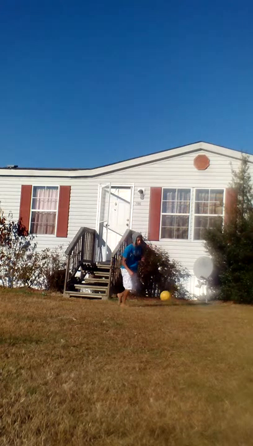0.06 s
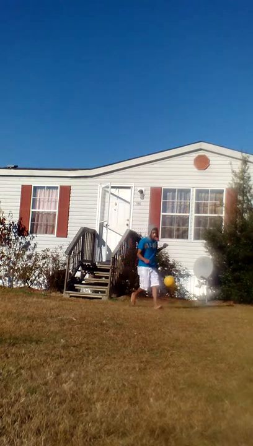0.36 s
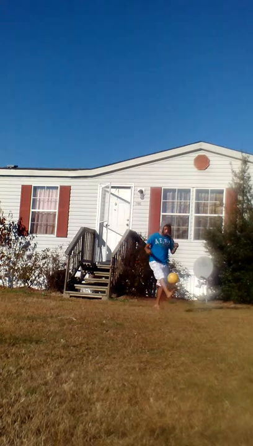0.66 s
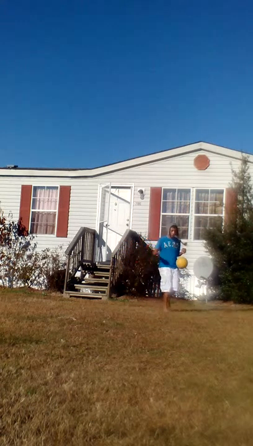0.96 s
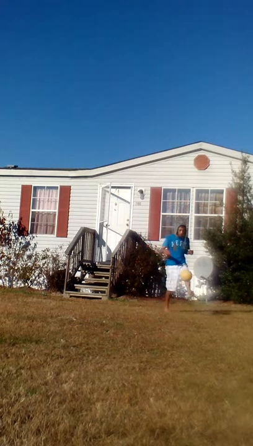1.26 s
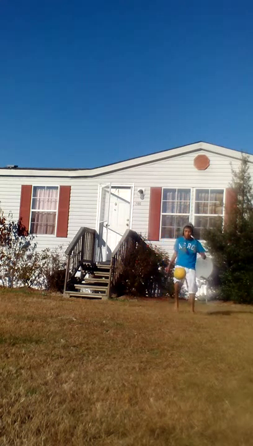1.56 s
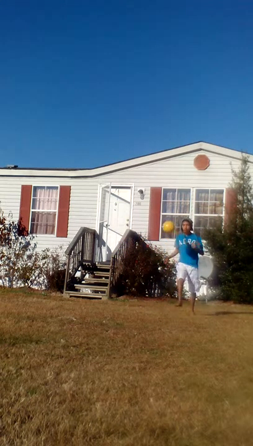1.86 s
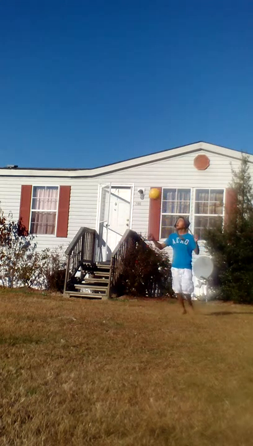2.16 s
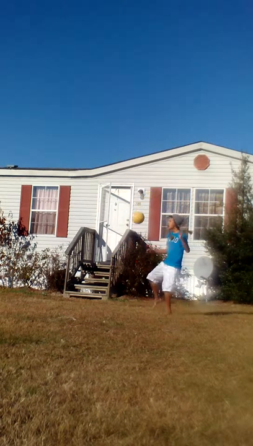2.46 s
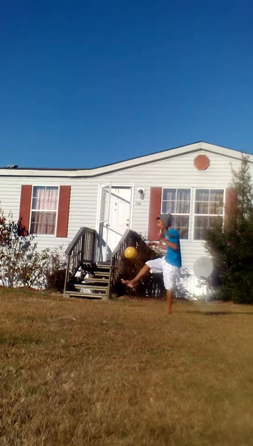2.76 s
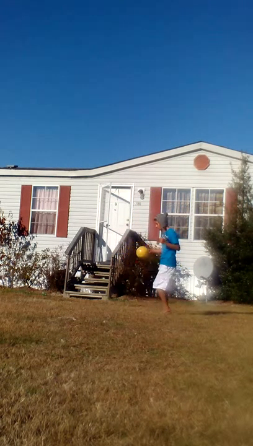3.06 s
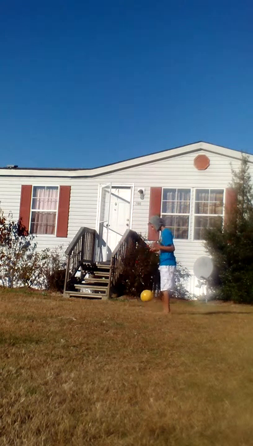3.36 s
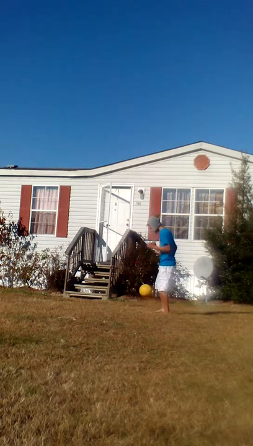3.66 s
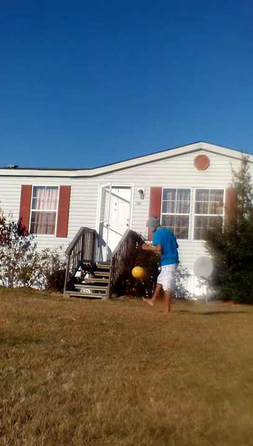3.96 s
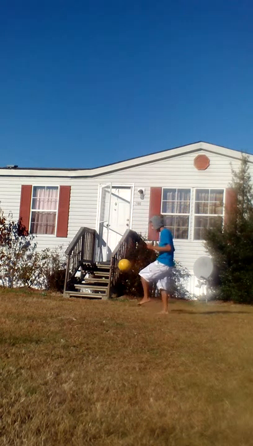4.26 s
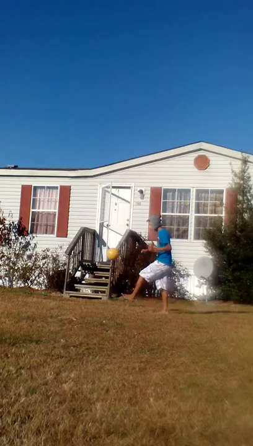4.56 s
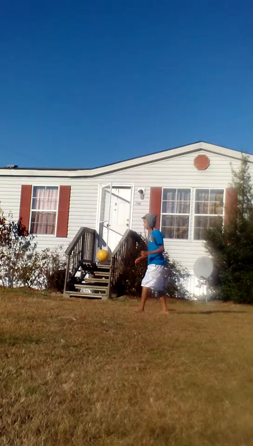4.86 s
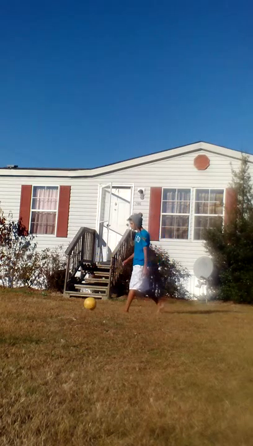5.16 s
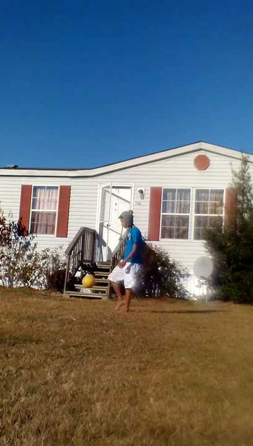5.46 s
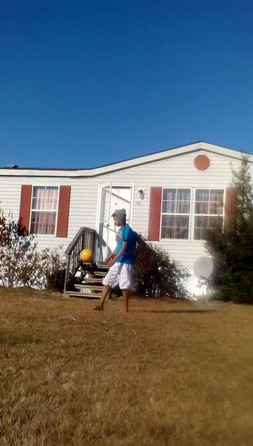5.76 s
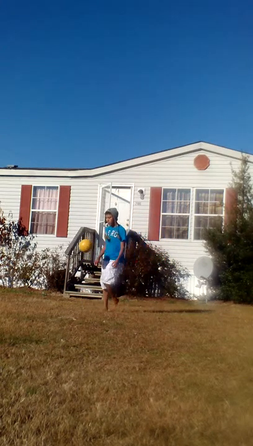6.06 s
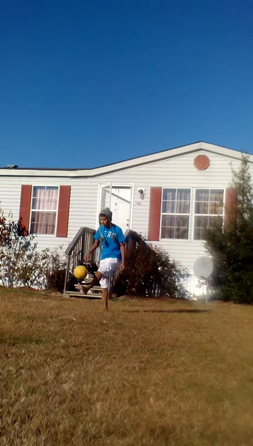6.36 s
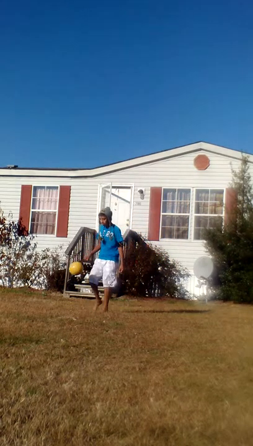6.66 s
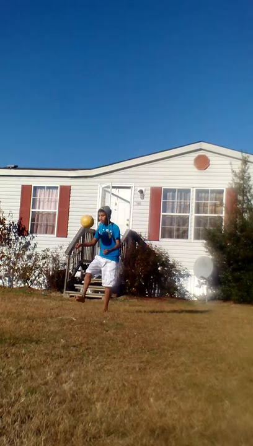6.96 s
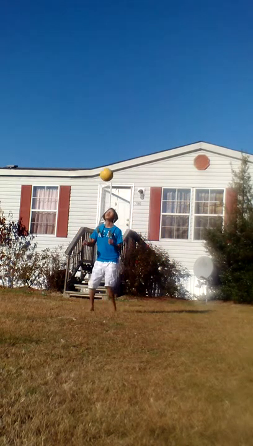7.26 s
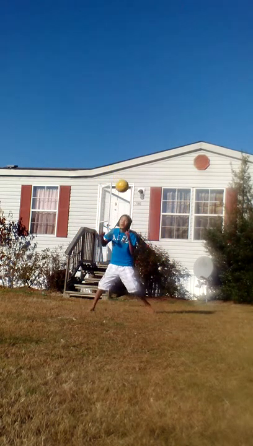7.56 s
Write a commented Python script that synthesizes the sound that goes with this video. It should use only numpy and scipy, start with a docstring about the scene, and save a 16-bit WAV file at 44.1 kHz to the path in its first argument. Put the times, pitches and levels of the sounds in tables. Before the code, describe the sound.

A ball is juggled barefoot on a lawn, a few metres from the microphone, over a quiet outdoor hush. Each touch is a hollow thump topped by a slap, with a very short echo from a house wall. The ball bounces dully on grass at 0.2 seconds, followed by a light touch at 0.7, a firmer kick at 1.3, the sharpest, loudest slap at 1.8 and another kick at 2.8. Meanwhile, light wind bumps the microphone until about 2.5 seconds, and a distant bird caws very faintly. A soft bounce at 3.5 leads to a faint tap at 3.9 and a crisp kick at 4.5. The ball lands again at 5.3, then come a lighter touch at 5.7 and clear kicks at 6.4 and 6.9. Feet faintly brush dry grass throughout, most noticeably near the end, and a small bird gives thin, distant whistles around 6 seconds.

```python
"""A football juggled barefoot on a lawn, some metres from a phone and in front of a house.
Each touch squashes the ball (thump), shakes its skin (pok), rings the air inside and slaps the cover.
Now and then it drops and bounces softly on the grass; the house front throws every hit back.
Feet brush dry blades, a light wind bumps the microphone, and far birds call over a quiet hush."""
import sys
import numpy as np
from scipy import signal
from scipy.fft import rfft, irfft
from scipy.io import wavfile

SR = 44100
rng = np.random.default_rng(int(sys.argv[2]) if len(sys.argv) > 2 else 0)


def generate_wav(signal):
    """Clip the signal to [-1, 1] and save it as 16-bit WAV at the path in sys.argv[1]."""
    frames = np.transpose(np.atleast_2d(signal))
    scaled = np.clip(frames, -1, 1) * 32767
    pcm = np.round(scaled).astype(np.int16)
    wavfile.write(sys.argv[1], SR, pcm)


N = 334719
TIME = np.arange(N) / SR  # scene clock, s
AGE = np.arange(8192) / SR  # one-shot clock, s


def undb(db):
    """Decibels to gain."""
    return 10 ** (np.asarray(db) / 20)


def level(x, db):
    """Set the rms level."""
    return x * undb(db) / np.sqrt(np.mean(x ** 2))


def hit_level(x, db):
    """Set a one-shot's level as if all its energy fell within 20 ms."""
    return x * undb(db) * np.sqrt(.02 * SR / np.sum(x ** 2))


def add(track, s, x):
    """Mix x into the track at time s."""
    i = max(int(s * SR), 0)
    track[i:i + len(x)] += x[:N - i]


def eq(x, curve, size=4096):
    """Minimum-phase EQ through (f/Hz, gain/dB) points, built from the cepstrum."""
    hz, db = np.transpose(curve)
    bins_hz = np.maximum(np.fft.rfftfreq(size, 1 / SR), 1)
    gain = undb(np.interp(np.log(bins_hz), np.log(hz), db))
    cepstrum = irfft(np.log(gain))
    cepstrum[1:size // 2] *= 2
    cepstrum[size // 2 + 1:] = 0
    impulse = irfft(np.exp(rfft(cepstrum)))
    return signal.fftconvolve(x, impulse)[:len(x)]


def band(x, low_hz, high_hz, order=2):
    """Band-pass."""
    return signal.sosfilt(signal.butter(order, [low_hz, high_hz], "band", fs=SR, output="sos"), x)


def swell(s, width_s):
    """A bell envelope centred on s, down to 1/e at width_s either side."""
    return np.exp(-np.minimum(((TIME - s) / width_s) ** 2, 50))


def burst(decay_s):
    """Noise with an instant attack and an exponential tail."""
    return rng.standard_normal(len(AGE)) * np.exp(-AGE / max(decay_s, .0001))


def decay(t60):
    """An envelope that falls 60 dB in t60 seconds."""
    return np.exp(-np.log(1000) * AGE / t60)


def scattered(count):
    """Random moments spread over the whole scene."""
    return (np.arange(count) + rng.random(count)) / count * N / SR


# tone of the outdoor bed: f/Hz, gain/dB
HUSH_EQ = [(25, -7.5), (43, -5), (60, -6.5), (105, -4.5), (150, -7.5), (250, -12.5), (450, -16),
           (700, -17.5), (1500, -23), (3000, -26.5), (5500, -28), (7000, -39), (9000, -60.5)]

def hush(rumble_db=-56.5, hiss_db=-74):
    """The bed: distant rumble under an even hiss."""
    rumble = level(eq(rng.standard_normal(N), HUSH_EQ), rumble_db)
    hiss = level(band(rng.standard_normal(N), 6200, 10000, order=3), hiss_db)
    return rumble + hiss


# a distant hoarse bird: t/s, half-width/s, f/Hz, level/dB
CAW_CUES = [(0.1, 0.26, 1480, -68), (0.728, 0.07, 1470, -66.5), (0.998, 0.042, 1480, -61),
            (1.458, 0.12, 1460, -65.5), (2.23, 0.069, 1360, -64)]
# a small bird's whistles: t/s, length/s, start f/Hz, middle f/Hz, end f/Hz, level/dB
WHISTLE_CUES = [(5.873, 0.042, 7700, 6600, 7600, -68.5), (5.874, 0.046, 8400, 9400, 8000, -70),
                (5.954, 0.029, 5530, 5500, 5770, -65.5), (6.193, .035, 3470, 3240, 3030, -72)]

def birds(hoarse_hz=100, waver_hz=90):
    """Far caws, smeared to one throat resonance, and a few thin, wavering whistles."""
    out = np.zeros(N)
    for s, width_s, hz, db in CAW_CUES:
        throat = band(rng.standard_normal(N), hz - hoarse_hz, hz + hoarse_hz)
        out += level(throat, db) * swell(s, width_s)
    for s, length_s, start_hz, middle_hz, end_hz, db in WHISTLE_CUES:
        progress = np.linspace(0, 1, int(length_s * SR))
        glide = np.polyval(np.polyfit([0, .5, 1], [start_hz, middle_hz, end_hz], 2), progress)
        waver = level(band(rng.standard_normal(len(AGE)), 60, 400), 0)[-len(progress):]
        tone = np.sin(2 * np.pi * np.cumsum(glide + waver_hz * waver) / SR)
        add(out, s, level(tone * np.sin(np.pi * progress), db))
    return out


def eddy(s, typical_hz=75, typical_width_s=0.009, scatter=0.21):
    """An eddy rocks the diaphragm for a cycle or two; a smaller one is higher and shorter."""
    size = np.exp(scatter * rng.standard_normal())
    cycles = typical_hz / size * (TIME - s) + rng.random()
    return swell(s, typical_width_s * size) * np.cos(2 * np.pi * cycles)


# fader ride of the breeze on the microphone: t/s, level/dB
BREEZE_RIDE = [(0, -63), (0.45, -48.5), (0.75, -53.5), (1.55, -48), (1.95, -57), (2.55, -57), (3.3, -61.5),
               (5.0, -63), (6.3, -60), (7.59, -59)]
# the strongest buffets: t/s, peak level/dB
BUFFET_CUES = [(0.377, -35.5), (0.443, -33), (0.543, -28.5), (1.01, -35.5), (1.122, -31.5), (1.385, -31.5),
               (2.202, -27.5), (2.376, -31.5)]

def wind(eddy_over_rumble_db=11.5, eddy_count=40):
    """Wind on the microphone: rumble and small eddies ride the breeze; a few buffets stand out."""
    rumble = level(band(rng.standard_normal(N), 37, 106), 0)
    eddies = undb(eddy_over_rumble_db) * sum(eddy(s) for s in scattered(eddy_count))
    breeze = undb(np.interp(TIME, *np.transpose(BREEZE_RIDE)))
    buffets = sum(undb(db) * eddy(s) for s, db in BUFFET_CUES)
    return breeze * (rumble + eddies) + buffets


# the firmer steps in dry grass: t/s, level/dB, half-width/s
STEP_CUES = [(0.99, -65, 0.033), (2.48, -71, 0.05), (3.084, -70, 0.04), (5.928, -57, 0.013),
             (6.661, -58.5, 0.022), (6.756, -62.5, 0.054), (7.182, -62, 0.015)]

def footsteps(grain_db=5, shuffle_db=-74, shuffle_s=0.044, shuffle_count=10):
    """Dry blades crackle densely under each step; light shuffles fall in between."""
    noise = rng.standard_normal(N)
    grains = np.repeat(rng.standard_normal(N // 32 + 1), 32)[:N]
    crackle = level(band(noise * undb(grain_db * grains), 2900, 7700), 0)
    steps = sum(undb(db) * swell(s, width_s) for s, db, width_s in STEP_CUES)
    shuffles = undb(shuffle_db) * sum(swell(s, shuffle_s) for s in scattered(shuffle_count))
    return crackle * (steps + shuffles)


# the ball's path in front of the house: t/s, distance to the wall/m
WALL_DISTANCE = [(0.22, 4.75), (0.71, 4.45), (1.3, 6.2), (1.77, 6.6), (4.5, 5.94), (5.7, 5.2), (6.42, 7.1)]

def house_echo(x, s, mirror=0.57, lawn=0.046, early=0.49, lead_s=0.01,
               siding_s=0.0052, trail=0.19, fade_s=0.025):
    """Slapback of a hit at time s: lawn, steps and shrubs scatter, the wall answers, its siding trails."""
    round_trip_s = 2 * np.interp(s, *np.transpose(WALL_DISTANCE)) / 343  # sound travels 343 m/s
    lag = AGE - round_trip_s
    foreground = np.where(lag > -lead_s, early, lawn)
    wall = np.exp(-np.abs(lag) / siding_s) + trail * np.exp(-np.abs(lag) / fade_s)
    impulse = rng.standard_normal(len(AGE)) * np.where(lag < 0, foreground, wall)
    impulse /= np.linalg.norm(impulse)
    impulse[np.argmin(np.abs(lag))] += mirror  # the one crisp reflection
    return signal.fftconvolve(x, impulse)[:len(x)]


def thump(hz, db, squash=0.7, sag_s=0.0066, t60=0.067, rise_s=0.0045):
    """The low end: the squashed ball pushes air, and the pitch sags to hz as it relaxes."""
    pitch = hz * (1 + squash * np.exp(-AGE / sag_s))
    tone = -np.sin(2 * np.pi * np.cumsum(pitch) / SR)
    attack = 1 - np.exp(-AGE / rise_s)
    return hit_level(tone * attack * decay(t60), db)


def modes(table, scatter_db=3.5, detune=.02):
    """Damped modes; strength and tuning vary at random, as the ball is never met in the same spot."""
    out = np.zeros(len(AGE))
    for hz, db, t60 in table:
        louder, sharper = rng.standard_normal(2)
        tone = np.sin(2 * np.pi * hz * (1 + detune * sharper) * AGE)
        out += undb(db + scatter_db * louder) * tone * decay(t60)
    return out


# modes of the ball's skin: f/Hz, relative level/dB, t60/s
SKIN_MODES = [(167.7, 6.5, 0.054), (250, -3, 0.065), (326.6, -2.5, 0.056), (420, -3, 0.054),
              (516, 5, 0.041), (614, 3, 0.034), (732, 3.5, 0.029), (854, -12.5, 0.014)]

def skin(centre_hz, db, focus_db_per_oct=8):
    """The pok: the skin rings most near centre_hz, which is higher for a bonier contact."""
    weighted = [(hz, mode_db - focus_db_per_oct * abs(np.log2(hz / centre_hz)), t60)
                for hz, mode_db, t60 in SKIN_MODES]
    return hit_level(band(modes(weighted), min(0.75 * centre_hz, 240), 870), db)


# modes of the air inside the ball: f/Hz, relative level/dB, t60/s
AIR_MODES = [(1070, -11.5, 0.015), (1440, -8.5, 0.012), (1850, 4, 0.011), (2260, 1, 0.0068),
             (2740, -1, 0.0073)]

def inner_air(db, ring_db=-3, smack_db=-7, smack_s=0.0033):
    """The ping: air squeezed from the contact smacks as the air inside starts to ring."""
    ring = hit_level(modes(AIR_MODES), db + ring_db)
    smack = hit_level(band(burst(smack_s), 1650, 2900), db + smack_db)
    return ring + smack


# bright tone of the slap, including the phone's brief ring near 4 kHz: f/Hz, gain/dB
BRIGHT_CLICK_EQ = [(800, -37), (2000, -21.5), (2750, -14.5), (3300, -2), (3750, -3.5), (4030, 2.5),
                   (4300, -11), (4700, -10.5), (5400, 0.5), (6400, -12.5), (7200, -26), (10000, -19)]
# bare skin sliding over the cover: f/Hz, gain/dB
SCUFF_EQ = [(800, -9.5), (2600, -4.5), (3200, 5.5), (4000, 2.5), (4700, -0.5), (5600, 7), (6600, 0),
            (10000, -5.5)]

def slap(contact_ms, shelf_db, db, grit=0.045, grip=0.3, flatten_db=-12, flatten_s=0.0038):
    """The top end: a square hit clicks, a glancing one scuffs; the cover flattens roughly on bare skin."""
    contact_s = contact_ms / 1000
    click = (AGE == 0) * np.exp(-contact_ms / 2)
    scuff = grit * burst(contact_s) * (1 - np.exp(-AGE / (grip * contact_s)))
    contact = hit_level(eq(click, BRIGHT_CLICK_EQ) + eq(scuff, SCUFF_EQ), 0)
    flatten = hit_level(band(burst(flatten_s), 3220, 4400, order=3), flatten_db)
    treble_shelf = [(3000, 0.02), (6000, shelf_db)]
    return hit_level(eq(contact + flatten, treble_shelf), db)


# soft bounces on the lawn: t/s, thump level/dB, skin level/dB
BOUNCE_CUES = [(0.2248, -36, -39), (3.5413, -42.5, -50.5), (5.2618, -38.5, -48)]

def bounces(thump_hz=66.4, skin_hz=242, blades_db=-25.5, crush_s=0.0069, send_db=-9):
    """The lawn gives more than a foot: a deeper thump, no slap, and a few crushed blades."""
    out = np.zeros(N)
    for s, thump_db, skin_db in BOUNCE_CUES:
        blades = hit_level(band(burst(crush_s), 500, 2100, order=1), thump_db + blades_db)
        direct = thump(thump_hz, thump_db) + skin(skin_hz, skin_db) + blades
        add(out, s, direct + house_echo(undb(send_db) * direct, s))
    return out


# touches of foot or knee: t/s, thump level/dB, skin level/dB, skin centre f/Hz,
# inner air level/dB, slap level/dB, slap treble shelf/dB, contact length/ms
KICK_CUES = [ (0.7110, -71, -42.5, 270, -64, -44, 2, 4), (1.295, -37, -42, 240, -42.5, -36.5, -11.5, 0.84),
             (1.7662, -35.5, -35.5, 250, -47, -20, -1.5, 0.22),
             (2.7822, -36.5, -38, 218, -44, -39, -6, 3.2), (3.925, -53, -50.5, 238, -64.5, -53.5, 7, 3.7),
             (4.504, -42, -48, 448, -44.5, -31.5, 9, 0.58), (5.6970, -47, -44, 660, -63.5, -46.5, 4.5, 6.3),
             (6.4169, -40, -41, 420, -42, -34.5, -1.5, 0.055),
             (6.893, -36, -33.5, 340, -43.5, -31.5, 13, 0.67), ]

def kicks(thump_hz=78, thump_send_db=-8, skin_send_db=-14, slap_send_db=-17.5,
          spread_db_per_decade=10, air_extra_send_db=7):
    """Every touch stacks thump, skin, inner air and slap, each with its own send to the house echo."""
    out = np.zeros(N)
    for s, thump_db, skin_db, skin_hz, air_db, slap_db, shelf_db, contact_ms in KICK_CUES:
        low = thump(thump_hz, thump_db)
        pok = skin(skin_hz, skin_db)
        ping = inner_air(air_db)
        crack = slap(contact_ms, shelf_db, slap_db)
        # longer, glancing contacts spread more of their top end to the wall
        top_send_db = slap_send_db + spread_db_per_decade * np.log10(contact_ms)
        send = undb(thump_send_db) * low + undb(skin_send_db) * pok
        send += undb(top_send_db) * (crack + undb(air_extra_send_db) * ping)
        add(out, s, low + pok + ping + crack + house_echo(send, s))
    return out


def scene():
    """The mono mix of the yard as it reaches the phone."""
    return (kicks() + bounces() + footsteps() + wind() + birds() + hush())[None]


# slits and cavities in front of the microphone: f/Hz, bandwidth/Hz
PORT_RESONANCES = [(4080, 250), (3700, 450), (4450, 1270)]
# the microphone's colour: f/Hz, gain/dB
MIC_EQ = [(20, -27.5), (33, -14.5), (50, 1), (6600, 1), (7300, -6), (7950, -17), (8800, -13.5), (9700, -21),
          (10400, -38), (13500, -44.5)]

def record(dry, top_hz=14000):
    """The phone rings briefly near 4 kHz after sharp sounds, thins the bass and cuts the top."""
    x = dry[0]
    for hz, width_hz in PORT_RESONANCES:
        radius = np.exp(-np.pi * width_hz / SR)
        poles = np.array([1, -2 * radius * np.cos(2 * np.pi * hz / SR), radius ** 2])
        x = signal.lfilter(poles[::-1], poles, x)  # all-pass: sound near hz is held back and rings on
    high_cut = signal.ellip(8, .2, 70, top_hz, fs=SR, output="sos")
    return signal.sosfilt(high_cut, eq(x, MIC_EQ))[None]


dry = scene()
out = record(dry)
generate_wav(out)
```